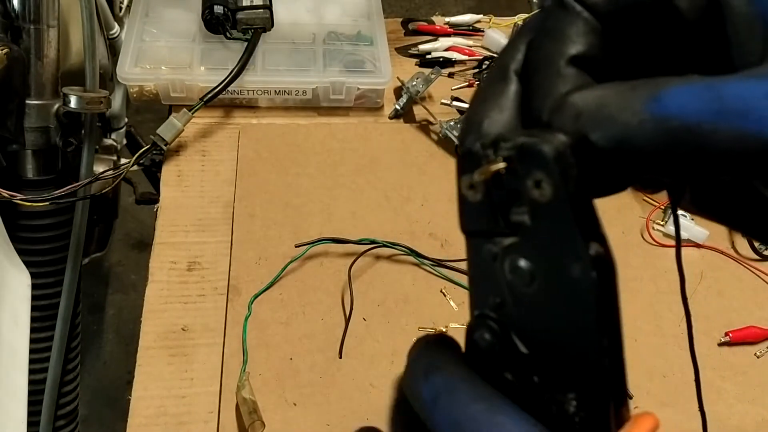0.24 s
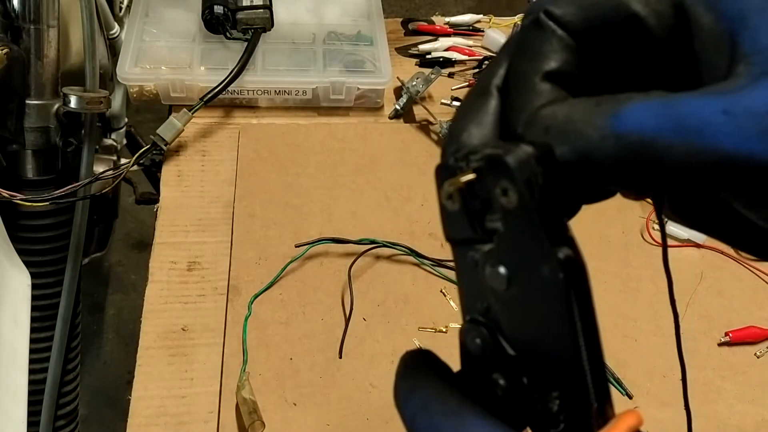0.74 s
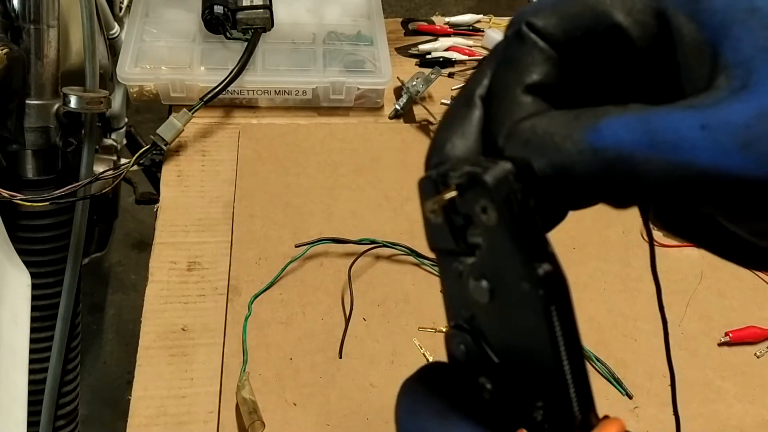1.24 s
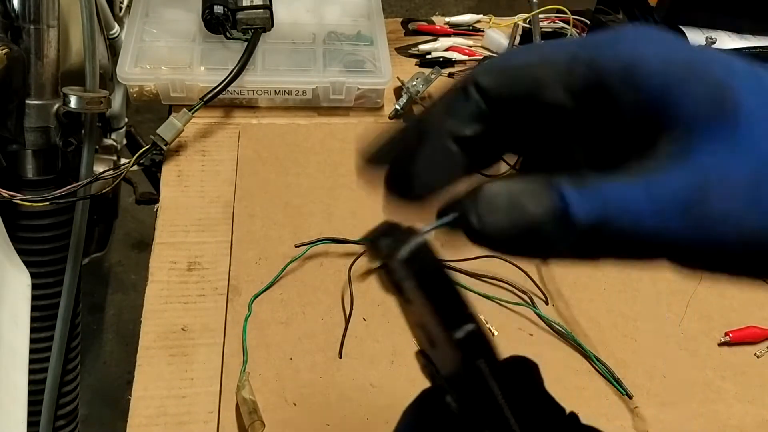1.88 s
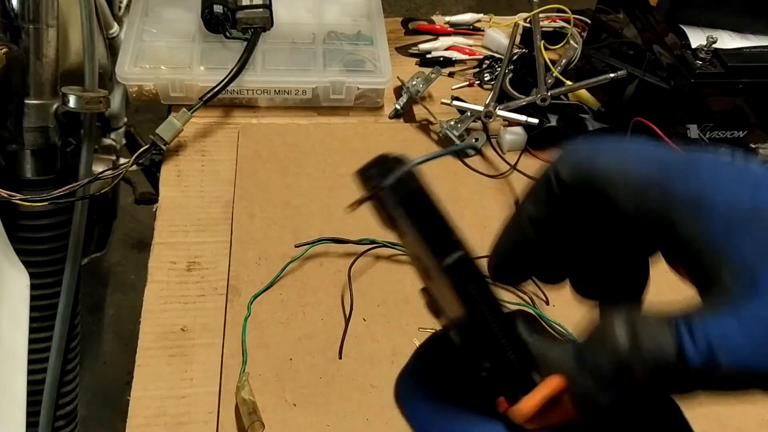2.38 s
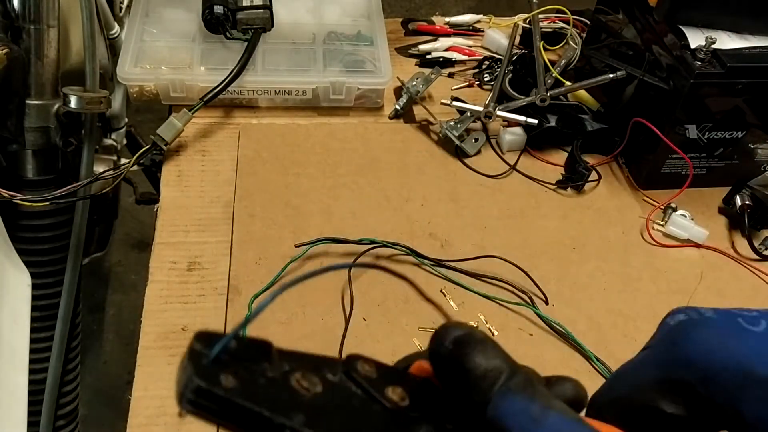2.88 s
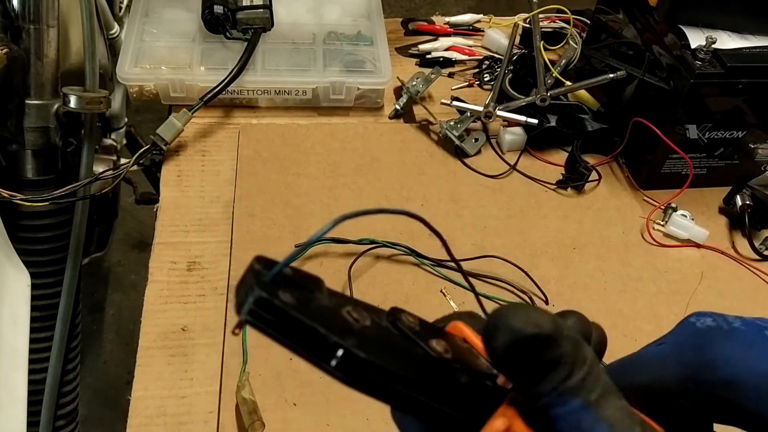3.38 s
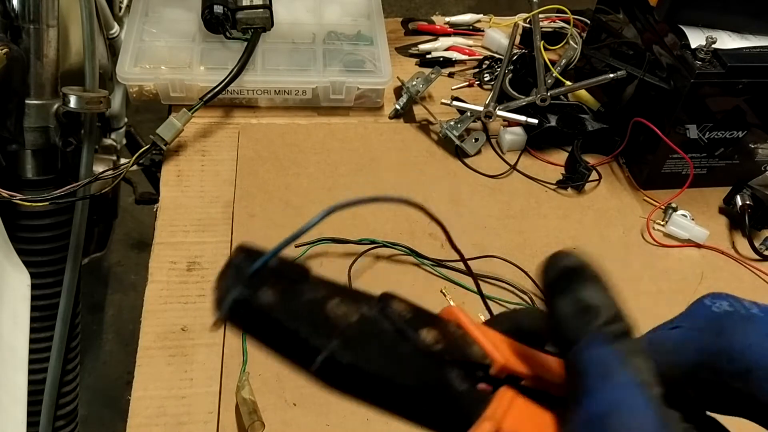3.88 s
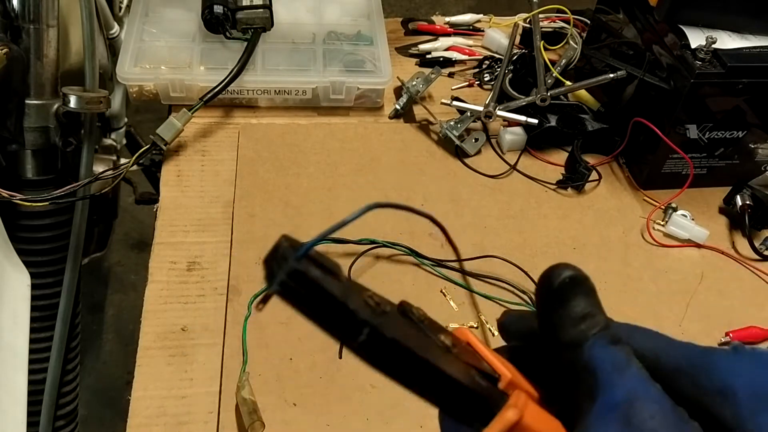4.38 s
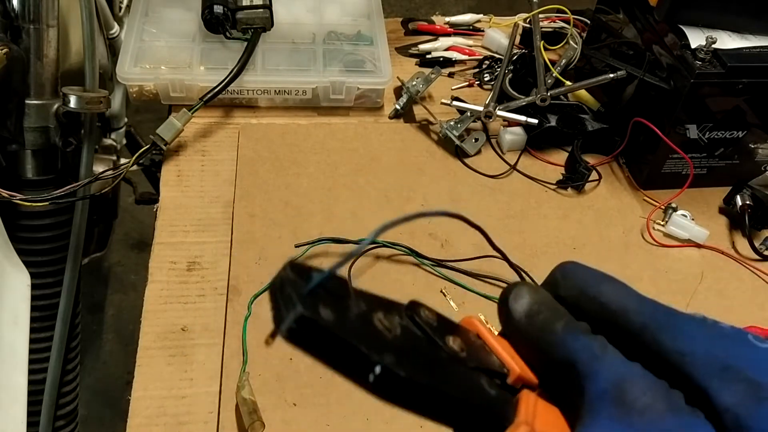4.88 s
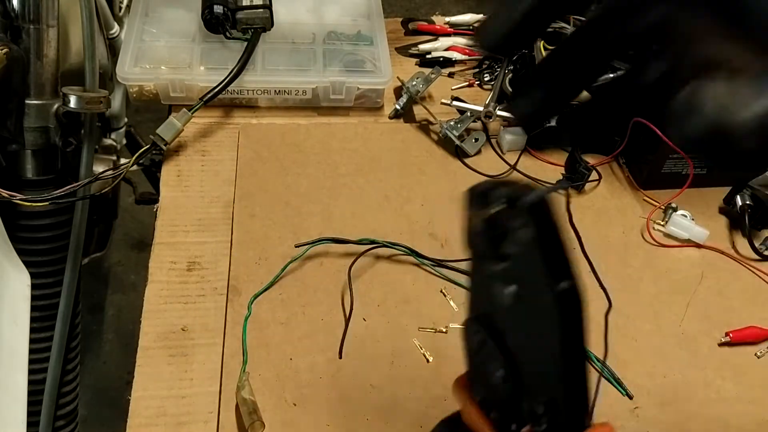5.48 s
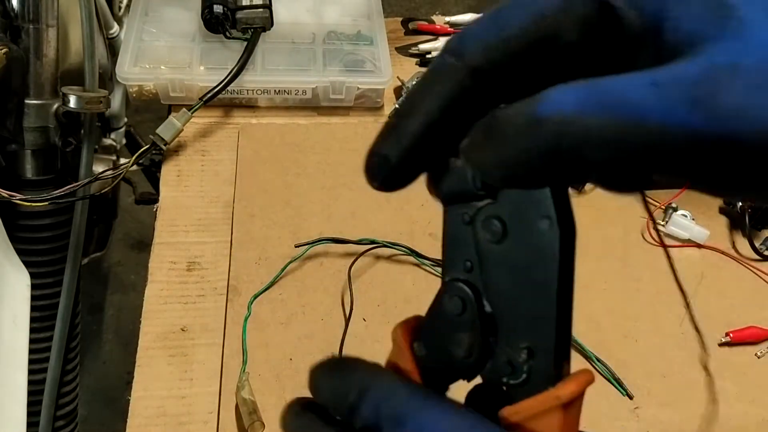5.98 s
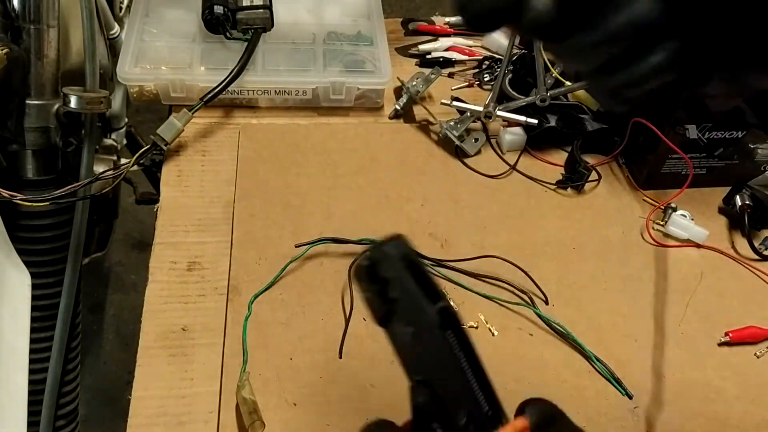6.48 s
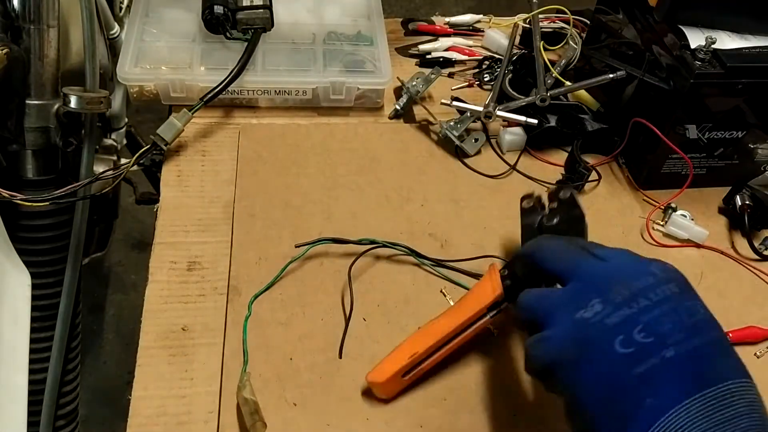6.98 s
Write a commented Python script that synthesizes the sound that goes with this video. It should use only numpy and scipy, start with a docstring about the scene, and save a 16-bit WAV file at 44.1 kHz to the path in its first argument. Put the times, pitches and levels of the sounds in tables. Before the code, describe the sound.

Ratchet crimping pliers are worked close to the microphone in a small hard room, over faint air, hum and low arm shuffling. At about 1.2 seconds comes one loud, bright metallic snap, followed by three quick ones between 1.5 and 1.7 seconds. Each pings, leaves the steel ringing thinly and has a short echo. From about 2 to 5.8 seconds it is much quieter: rubber gloves slide with a soft hiss while wire and handles tick lightly, most noticeably around 3.3 and 5.3 seconds. A smaller click at 5.8 seconds leads to a rapid run of five sharp ratchet snaps from 6 to 6.2 seconds, with dull bumps through the handles. Around 6.8 seconds the pliers scrape faintly across the cardboard-covered bench amid more glove rubbing and ticks. At about 7.2 seconds they are put down with a thud and a metallic clack.

```python
"""Bright snaps of ratchet crimping pliers, close by, over a cardboard-covered bench in a small hard room.
The pawl drops from tooth to tooth: each snap chatters, pings and leaves the steel ringing faintly.
Gloves hiss by friction; wire and handles tick in the hand; air, hum and arm shuffle lie underneath.
At the end the pliers scrape the cardboard and are put down with a thud and a clack."""
import sys
import numpy as np
from scipy import signal
from scipy.fft import rfft, irfft, next_fast_len
from scipy.io import wavfile

SR = 44100
rng = np.random.default_rng(int(sys.argv[2]) if len(sys.argv) > 2 else 0)


def wrap_up_sound(samples):
    """Save the sound to the file named by the first command line argument, as 16-bit audio."""
    columns = np.atleast_2d(samples).T
    # keep every value between -1 and 1, then stretch to whole-number steps
    tamed = np.clip(columns, -1, 1)
    steps = np.round(tamed * 32767).astype(np.int16)
    wavfile.write(sys.argv[1], SR, steps)


N = 319680
TIME_S = np.arange(N) / SR
SNAP_RISE_S = 0.0005

# Left-right likeness of near and of diffuse sound: freq_hz, correlation
NEAR_CORRELATION = [(100, 1), (1000, 0.73), (3000, 0.46), (7000, 0.081), (14000, 0.18)]
AIR_CORRELATION = [(60, 0.58), (150, 0.77), (380, 0.29), (950, -0.18), (2380, -0.08), (5980, 0.033),
                   (15000, 0.08)]
# Balance of the tool and of the background: freq_hz, left_over_right_db
TOOL_BALANCE = [(200, 13.5), (800, 1), (2400, 2.5), (4500, -3.5), (6800, -4.5), (9200, -2.5), (11300, 18),
                (12400, 20.5), (14500, 12)]
AIR_BALANCE = [(60, 1), (150, 0), (380, 3), (950, -1), (2380, 0), (5980, -2.5), (15000, 7.5)]
# Room decay: freq_hz, t60_s
ROOM_T60 = [(100, 0.85), (500, 0.79), (1500, 1), (3500, 1), (7000, 0.84), (11000, 0.56), (16000, 0.26)]
# Source spectra: freq_hz, gain_db
AIR_SPECTRUM = [(20, -19), (45, 1), (75, -6), (130, -5), (220, -3), (280, -4.5), (380, -3), (580, -5.5),
                (680, -11.5), (800, -11.5), (1400, -13), (2800, -19.5), (6000, -22), (11500, -18.5),
                (12800, -23), (16000, -42.5)]
SHUFFLE_SPECTRUM = [(25, -14), (50, -2.5), (100, -6), (200, -5), (310, 2.5), (500, -11.5), (900, -8.5),
                    (2500, -38.5)]
RUB_SPECTRUM = [(100, -11), (400, -25), (900, 1), (1900, -5), (3200, -1), (4800, 4), (8000, 8.5),
                (10200, 7.5), (11700, 5.5), (13000, -4), (16000, -7.5)]
TICK_SPECTRUM = [(60, -22), (350, 7.5), (700, 4.5), (1800, 3), (3200, 2), (5000, -1), (8000, 0.5),
                 (11500, -1.5), (16000, -17)]
THUD_SPECTRUM = [(40, -16.5), (75, -16.5), (120, -9), (240, 2), (550, -1), (1000, 8), (2000, -4),
                 (8000, -18)]
SNAP_SPECTRUM = [(60, -22.5), (250, -19), (700, -30), (1500, -20.5), (2600, -11.5), (3600, -11.5),
                 (5800, -4), (7800, -1), (9600, 0.5), (11000, -5.5), (12500, -4), (16000, -4)]
SNAP_ECHO_SPECTRUM = [(60, -22), (250, -25), (800, -22.5), (1800, -20.5), (2800, -11.5), (3900, -13),
                      (5500, -8.5), (7000, -3), (9600, -3.5), (11700, 3), (12800, -11), (16000, -11)]
# Background tones: start_s, length_s, pitch_hz, level_db
FAINT_TONES = [(0.0, 0.12, 483, -69), (0.078, 0.22, 626, -76.5), (0.25, 0.18, 695, -77),
               (0.36, 0.8, 794, -80), (0.754, 0.3, 600, -72.5), (2.778, 0.21, 538, -71)]
# Workshop hum: pitch_hz, level_db
HUM_PARTIALS = [(49, -85.5), (100, -81), (184.5, -73.5), (479, -80.5), (608, -88.5)]
# Arm movements: start_s, length_s, level_db
ARM_MOVES = [(0.198, 1.55, -70.5), (2.145, 1.13, -69.5), (3.24, 0.28, -66), (5.094, 0.66, -68),
             (6.178, 1.52, -61.5)]
# Glove slides on tool or wire, before the offsets in glove_rub:
# start_s, length_s, level_db, treble_over_middle_db, hollow_over_middle_db
GLOVE_STROKES = [(0.141, 0.093, -59.5, -2, -7), (1.923, 0.091, -48, 3, 7), (2.488, 0.18, -51.5, 0, -5),
                 (2.622, 0.16, -52.5, 3, 1), (2.696, 0.13, -48.5, 9.5, 7), (2.815, 0.66, -55.5, 1.5, 7),
                 (3.304, 1, -62.5, 6.5, 7), (3.66, 0.14, -49.5, 0.5, 3), (3.814, 0.095, -57.5, 2, 5),
                 (3.947, 0.4, -58.5, -1, -5), (4.297, 0.096, -50.5, 4.5, 8),
                 (4.357, 0.057, -50.5, -4.5, -8.5), (4.386, 0.76, -62.5, 8, 7.5),
                 (4.639, 0.14, -58.5, 2.5, 1.5), (5.193, 0.24, -43.5, 0.5, 3), (5.275, 0.098, -39, 18, 9.5),
                 (5.435, 0.27, -49.5, -3.5, -5), (5.688, 0.15, -54.5, -6, -7), (5.797, 0.28, -52, -0.5, -4),
                 (6.303, 0.59, -54, 2, 4.5), (6.76, 0.17, -49.5, 4, 6), (6.874, 0.17, -41, 0.5, -2)]
# Hollow resonances of the plastic grips: freq_hz, gain_db
GRIP_MODES = [(1230, -9), (1880, 5.5), (2350, 0), (3150, -23.5)]
# Wire, terminal and handle contacts: start_s, level_db, length_ms, tilt_db_per_oct, resonance_hz, lift_db
HAND_TICKS = [(0.19, -56, 5.2, 2, 1820, 6), (0.712, -55.5, 0.92, 2, 9800, 7.5),
              (1.1677, -45.5, 0.4, -1, 4500, 0.5), (1.5673, -45.5, 1.8, -0.5, 10000, 8),
              (1.9123, -44, 0.54, 3, 5500, 6), (1.9663, -46.5, 0.98, 2.5, 3690, 15),
              (1.9732, -40.5, 6.2, 2.5, 3960, 12), (2.553, -56.5, 5.2, 4, 1714, 11),
              (2.581, -59, 3.9, 2, 2410, 18), (2.931, -42.5, 1.8, 0.5, 2250, 21),
              (3.1465, -45.5, 0.9, 1, 6900, 4), (3.1595, -43, 1.8, 3.5, 2040, 16),
              (3.1805, -41, 1.1, 1.5, 2860, 16), (3.1955, -40.5, 3.3, 1.5, 5750, 5.5),
              (3.2012, -39.5, 2, 3.5, 1900, 3), (3.347, -35, 7.4, 3, 1750, 4),
              (3.669, -51.5, 2.2, 0, 1600, 12.5), (3.7372, -41.5, 6.2, 1, 6160, 9),
              (3.758, -50.5, 1.8, 1, 6000, 8.5), (3.7826, -39.5, 1.1, 1.5, 9600, 6),
              (4.0786, -46, 2.9, 1, 3000, 6), (4.104, -45.5, 1.4, 1, 3460, 8),
              (4.1424, -48.5, 3.2, 5.5, 7240, 7), (4.163, -57.5, 1, 4.5, 8000, 8),
              (4.182, -47, 3.8, 1.5, 3520, 11), (4.327, -51, 10, 2, 2900, 15),
              (4.337, -51.5, 7, -1.5, 2200, 18.5), (5.0332, -53.5, 7.4, -5.5, 1120, 5.5),
              (5.206, -53, 1.9, 0, 1800, 7), (5.2266, -56, 3.7, 0, 2630, 5.5),
              (5.245, -43.5, 0.93, 4, 6300, 13), (5.262, -41.5, 1.8, 0.5, 1300, 1.5),
              (5.2952, -38, 3.7, -1, 1270, 1), (5.346, -34, 5, 2.5, 1680, 8),
              (5.5155, -46.5, 0.75, -4.5, 3700, 19), (5.569, -49.5, 2.2, 3, 1360, 23.5),
              (5.5877, -41, 1.8, 1.5, 3220, 2.5), (5.612, -46.5, 1.6, -3.5, 2840, 10),
              (5.879, -47, 3.4, 6, 2820, 20), (6.692, -57, 2.3, 1.5, 3360, 3),
              (6.818, -35, 2.3, 4.5, 4340, 7), (6.9500, -36.5, 7, 5, 1790, 18),
              (7.1725, -41, 4.3, 0, 2220, 19), (7.178, -36.5, 27, 0.5, 2200, 11)]
# Dull blows through the handles or onto the bench: start_s, level_db, cutoff_hz, send_db, hand_weight_db
THUDS = [(1.1665, -57, 513, -6.5, -17.5), (1.1827, -48.5, 330, -11.5, -7), (1.5666, -44, 343, -2.5, -6.5),
         (1.5849, -51, 420, -4, -2), (1.669, -51.5, 149, -3, 1.5), (3.348, -43, 296, -16, -23),
         (3.3545, -49, 262, -19, -5), (4.0787, -51.5, 780, 0, -24.5), (5.9950, -43.5, 880, -17, -24),
         (6.0515, -42.5, 400, -13, -14), (6.0810, -49, 397, -11, -12), (6.1445, -64, 400, -11, -14),
         (7.1887, -26, 1480, -2, -34)]
# Pawl and jaw snaps; send_db and steel_db are trims: start_s, level_db, chatter_ms, tilt_db_per_oct,
# low_ping_hz, middle_ping_hz, high_ping_hz, send_db, tail_tilt_db_per_oct, steel_db
SNAPS = [(1.181, -13.5, 1.8, 1.5, 6960, 10660, 11980, 1, 3, -2),
         (1.5284, -11, 2.97, 0.4, 7670, 8790, 11290, -1.5, 1.5, -9.5),
         (1.5823, -13, 2.76, -1.4, 7330, 8030, 11750, 0.5, 3.5, -7),
         (1.6683, -10.5, 3.4, -0.3, 5560, 7030, 8710, -3, 1, -6.5),
         (5.8348, -25, 0.25, 0.5, 8100, 9550, 11940, -11, -1, -3),
         (5.9942, -13.5, 1.97, -0.4, 5920, 8480, 11200, -2, -2.5, 0),
         (6.0210, -13, 1.05, -1.5, 5680, 9260, 10870, -5.5, 0, -9),
         (6.049, -15.5, 1.6, -1, 5600, 8600, 11760, 1, 2, -14),
         (6.0804, -13, 2.08, 0.5, 4760, 5150, 10570, -0.5, 1, -13),
         (6.1435, -13, 0.62, 0, 4310, 7130, 10900, -0.5, 0, 0.5),
         (7.1971, -16.5, 1.04, -2, 5010, 8100, 11160, 2, -2, 1)]
# Steel plate modes, relative strength per jaw load: freq_hz, t60_s, bite_db, squeeze_db, opening_db
STEEL_MODES = [(2640, .4, -8, -6, 0), (2929, .35, -10, -10, 0), (3440, .35, -3, -1, 6),
               (4016, .55, -2, 2, -2), (4382, .5, 3, 7, -6), (4597, .35, -6, -8, 2), (4990, .45, -5, 7, 6),
               (5146, .42, 1, 8, 3), (5600, .35, 4, 2, 3), (5857, .4, 12, 3, -8), (6100, .3, 0, 7, 4),
               (6490, .35, 9, 0, 6), (7031, .35, 4, 13, 0), (7190, .35, 3, 9, 6), (7440, .35, 3, 5, 7),
               (8635, .35, 6, 0, 8), (8818, .25, 15, 0, 0), (10190, .4, 11, 12, 8), (10767, .35, 15, 3, 8),
               (11036, .35, 4, 6, 13), (11270, .5, 15, 6, 9), (11600, .4, 16, 6, 7)]
# Jaw load changes after the first bite: squeeze_start_s, opening_start_s
LOAD_CHANGES_S = (1.4, 3.0)
# Spring ringing after a snap, pitch set by its tension: start_s, pitch_hz, level_db
SPRING_RINGS = [(1.182, 10800, -46), (1.667, 11100, -48.5), (6.144, 11040, -53)]
# Random spectral ripple in the snaps' tail: spacing_hz, spread_db
TAIL_RIPPLE = (65, 4.2)
# Pliers' head dragging on the bench: start_s, length_s, level_db
BENCH_SCRAPE = (6.81, 0.25, -55.5)
# Scrape resonances: freq_hz, gain_db
CARDBOARD_MODES = [(950, -6), (1200, 3), (1850, 4), (2300, -19)]


def from_db(db):
    """Decibels to gain."""
    return 10 ** (np.asarray(db) / 20)


def unit_rms(x):
    """Scale to rms 1."""
    return x / np.sqrt(np.mean(x ** 2) + 1e-20)


def at_hz(table, hz):
    """Read a table on a log-frequency axis."""
    freqs_hz, values = np.transpose(table)
    return np.interp(np.log(np.maximum(hz, 1)), np.log(freqs_hz), values)


def butter(x, hz, kind, order):
    """Causal Butterworth filter."""
    return signal.sosfilt(signal.butter(order, hz, kind, fs=SR, output="sos"), x)


def resonance(x, hz, q):
    """Band-pass with unit peak gain."""
    return signal.lfilter(*signal.iirpeak(hz, q, fs=SR), x)


def coloured(x, spectrum, tilt_db_per_oct=0):
    """Minimum-phase filter; the tilt acts above 1 kHz and pivots at 4 kHz."""
    size = 2 * next_fast_len(x.shape[-1] // 2 + 2048)
    hz = np.fft.rfftfreq(size, 1 / SR)
    octaves = np.log2(np.maximum(hz, 1000) / 4000)
    gain = from_db(at_hz(spectrum, hz) + tilt_db_per_oct * octaves)
    cepstrum = irfft(np.log(gain), size)
    cepstrum[1:size // 2] *= 2
    cepstrum[size // 2 + 1:] = 0
    return irfft(rfft(x, size) * np.exp(rfft(cepstrum)), size)[..., :x.shape[-1]]


def stereo_noise(correlation, size):
    """White noise with the given left-right correlation."""
    mid, side = rfft(rng.standard_normal((2, size)))
    alike = at_hz(correlation, np.fft.rfftfreq(size, 1 / SR))
    return irfft(np.sqrt(1 + alike) * mid + np.sqrt(1 - alike) * side * [[1], [-1]], size) / np.sqrt(2)


def drift(rate_hz):
    """Slow random curve with spread 1."""
    knots = rng.standard_normal(8000)
    return np.interp(TIME_S * rate_hz, np.arange(len(knots)), knots) * np.sqrt(1.5)


def movement(start_s, length_s, rise_share=0.28, fall_share=0.58):
    """Speed of a movement, 0-1: speeds up, holds, slows down."""
    progress = (TIME_S - start_s) / length_s
    ramp = np.clip(np.minimum(progress / rise_share, (1 - progress) / fall_share), 0, 1)
    return np.sin(np.pi / 2 * ramp) ** 1.5


def panned(x, left_db):
    """Lean a sound to the left."""
    return x * from_db([[left_db / 2], [-left_db / 2]])


def leaned(x, balance, share=1):
    """Pan band by band."""
    half = np.array(balance) * [1, share / 2]
    return np.array([coloured(x[0], half), coloured(x[1], half * [1, -1])])


def add(track, start_s, sound):
    """Mix a sound in at a time."""
    i = int(start_s * SR)
    track[:, i:i + sound.shape[-1]] += sound[..., :N - i]


def at_level(sound, level_db):
    """Give a short sound the energy of 5 ms at this level."""
    energy = np.mean(np.sum(sound ** 2, axis=-1))
    return sound * from_db(level_db) * np.sqrt(.005 * SR / energy)


def room(x, first_s=0.0019, build_s=0.0029, early_db=8.5, early_s=0.1):
    """Diffuse echoes of unit energy: quick build-up, decay band by band."""
    t = TIME_S[:SR]
    white = rfft(stereo_noise(AIR_CORRELATION, SR))
    centres_hz = np.geomspace(100, 16000, 12)
    log_hz = np.log(np.maximum(np.fft.rfftfreq(SR, 1 / SR), 1))
    tail = 0
    for hz, share in zip(centres_hz, np.eye(len(centres_hz))):
        band = irfft(white * np.interp(log_hz, np.log(centres_hz), share), SR)
        tail += band * from_db(-60 * t / at_hz(ROOM_T60, hz))
    tail *= np.clip((t - first_s) / build_s, 0, 1)
    tail *= from_db(early_db * np.exp(-t / early_s))
    return signal.fftconvolve(x, unit_rms(tail) / np.sqrt(SR), axes=-1)[:, :N]


def faint_tones(waver_hz=11, flutter_db=5.5):
    """Thin tones come and go, unsteady in pitch and level."""
    tones = 0
    for start_s, length_s, pitch_hz, level_db in FAINT_TONES:
        phase = 2 * np.pi * np.cumsum(pitch_hz + waver_hz * drift(33)) / SR
        tones += from_db(level_db + flutter_db * drift(20)) * movement(start_s, length_s) * np.sin(phase)
    return tones


def background(air_db=-66, waver_db=2, resting_arms_db=-74):
    """Still air, wavering hum, faint tones and the low shuffle of the arms."""
    air_gain = from_db(air_db + waver_db * drift(10))
    air = air_gain * unit_rms(coloured(stereo_noise(AIR_CORRELATION, N), AIR_SPECTRUM))
    hum = 0
    for pitch_hz, level_db in HUM_PARTIALS:
        amplitude = np.sqrt(2) * from_db(level_db + drift(2.6))
        hum += amplitude * np.sin(2 * np.pi * pitch_hz * TIME_S + .5 * drift(0.85))
    moves = sum(from_db(db) * movement(start_s, length_s) for start_s, length_s, db in ARM_MOVES)
    effort = np.hypot(from_db(resting_arms_db), moves)
    shuffle = effort * unit_rms(coloured(stereo_noise(AIR_CORRELATION, N), SHUFFLE_SPECTRUM))
    return leaned(air + hum + faint_tones() + shuffle * from_db(drift(27)), AIR_BALANCE)


def glove_rub(gain_db=-5.5, treble_db=7, grip_db=-3, catches_per_s=240, catch_db=2, split_hz=4500,
              judder_db=1.5, echo_db=-4):
    """Rubber slides with a fine hiss, catches in tiny grains and wakes the hollow grips."""
    catches = (rng.random(N) < catches_per_s / SR) * from_db(3 * np.minimum(rng.exponential(1, N), 3))
    grains = unit_rms(signal.lfilter([1], [1, -.95], catches + 1e-18))
    friction = stereo_noise(NEAR_CORRELATION, N) * np.hypot(1, from_db(catch_db) * grains)
    slide = coloured(friction, RUB_SPECTRUM)
    treble = unit_rms(butter(slide, split_hz, "high", order=3))
    finger_pressure = from_db(judder_db * drift(45))
    middle = unit_rms(butter(slide, split_hz, "low", order=3) * finger_pressure)
    # The shifting hold frees and damps each grip mode.
    modes = (from_db(db + 5.1 * drift(22.79)) * resonance(slide, hz, q=5.2) for hz, db in GRIP_MODES)
    hollow = unit_rms(sum(modes))
    powers = np.zeros((3, N))
    for start_s, length_s, level_db, bright_db, hollow_db in GLOVE_STROKES:
        shares = from_db([0, bright_db + treble_db, hollow_db + grip_db])
        envelope = from_db(level_db + gain_db) * movement(start_s, length_s)
        powers += np.outer(shares / np.linalg.norm(shares), envelope) ** 2
    near = sum(part * np.sqrt(power) for part, power in zip((middle, treble, hollow), powers))
    return panned(leaned(near, TOOL_BALANCE, share=0.95), left_db=2.5) + from_db(echo_db) * room(near)


def chatter(length_ms, ring_ms, after_db, after_ms, blow_gain, size=4096):
    """Hard parts meet and chatter, with an optional sharp blow; their dense modes die, fast at first."""
    late_ms = np.maximum(TIME_S[:size] * 1000 - length_ms, 0)
    envelope = np.exp(-late_ms / ring_ms) + from_db(after_db) * np.exp(-late_ms / after_ms)
    rattle = stereo_noise(NEAR_CORRELATION, size) * envelope
    arrival_samples = rng.integers(0, 6, (2, 1))
    return rattle + blow_gain * np.linalg.norm(rattle[0]) * (np.arange(size) == arrival_samples)


def hand_ticks(echo_db=-10):
    """Wire, terminal and grips touch lightly; each contact point favours one resonance."""
    near = np.zeros((2, N))
    for start_s, level_db, length_ms, tilt_db_per_oct, resonance_hz, lift_db in HAND_TICKS:
        touch = chatter(length_ms, ring_ms=1, after_db=-11.5, after_ms=17, blow_gain=0.31)
        touch = coloured(touch, TICK_SPECTRUM, tilt_db_per_oct)
        touch += (from_db(lift_db) - 1) * resonance(touch, resonance_hz, q=3.1)
        add(near, start_s, at_level(touch, level_db))
    return panned(leaned(near, TOOL_BALANCE, share=0.72), left_db=2) + from_db(echo_db) * room(near)


def thuds(echo_db=-5, weight_hz=110):
    """Soft contact: a low-passed push into a damped body, plus the deep bump of the hand's weight."""
    near, sent = np.zeros((2, 2, N))
    for start_s, level_db, cutoff_hz, send_db, weight_db in THUDS:
        push = butter(signal.unit_impulse(SR // 5), cutoff_hz, "low", order=4)
        bump = from_db(weight_db) * butter(push, weight_hz, "low", order=1)
        blow = at_level(coloured(push, THUD_SPECTRUM) + bump, level_db)
        add(near, start_s, blow)
        add(sent, start_s, blow * from_db(send_db + echo_db))
    return near + room(sent)


def pings(pitches_hz, chatter_ms, size, levels_db=(-5.5, -7, -5), ring_ms=0.89):
    """Struck parts sound three short tones while they chatter; random phase per channel."""
    t = TIME_S[:size]
    envelope = np.clip(t / SNAP_RISE_S, 0, 1) * np.exp(-np.maximum(t * 1000 - chatter_ms, 0) / ring_ms)
    return envelope * sum(from_db(db) * np.sin(2 * np.pi * (hz * t + rng.random((2, 1))))
                          for hz, db in zip(pitches_hz, levels_db))


def steel_ring(load_index, scatter_db=0.5):
    """A snap strikes the long plate modes; jaw load sets which ring freely."""
    hz, t60_s, *levels_db = np.transpose(STEEL_MODES)[:, :, None]
    t = TIME_S[:SR]
    strength = from_db(levels_db[load_index] + scatter_db * rng.uniform(-1.1, 1, (2, len(hz), 1)))
    # Left and right are up to half a cycle apart.
    phase = rng.uniform(0, 2 * np.pi, (len(hz), 1)) + rng.uniform(0, np.pi, (2, len(hz), 1))
    return np.sum(strength * from_db(-60 * t / t60_s) * np.sin(2 * np.pi * hz * t + phase), axis=1)


def spring_ring(pitch_hz, t60_s=0.93):
    """The spring sings on: one thin, slowly dying tone."""
    t = TIME_S[:2 * SR]
    return from_db(-60 * t / t60_s) * np.sin(2 * np.pi * pitch_hz * t)


def rippled(x):
    """A fixed random ripple of narrow peaks and dips gives the snaps' tail a rough, jangling colour."""
    spacing_hz, spread_db = TAIL_RIPPLE
    hz = np.arange(2400, 12500, spacing_hz)
    gain = unit_rms(from_db(spread_db * np.clip(rng.standard_normal(len(hz)), -2, 1.3)))
    gain[[0, -1]] = 1
    return coloured(x, np.column_stack([hz, 20 * np.log10(gain)]))


def wall_echo(x, delay_s=0.011, echo_db=-18):
    """One reflection off a hard surface nearby."""
    return from_db(echo_db) * np.pad(x, [(0, 0), (int(delay_s * SR), 0)])[:, :N]


def ratchet(echo_db=-4.5, ring_db=-39, chatter_echo_db=-4, ring_echo_db=-4):
    """The pawl drops: a bright pinging crack, ringing steel and spring, room echoes."""
    near, sent, ringing = np.zeros((3, 2, N))
    for (start_s, level_db, chatter_ms, tilt_db_per_oct, *pings_hz,
         send_db, tail_tilt_db_per_oct, steel_db) in SNAPS:
        contact = chatter(chatter_ms, ring_ms=0.35, after_db=-15, after_ms=4.5, blow_gain=0)
        size = contact.shape[-1]
        contact *= np.clip((TIME_S[:size] + 1 / SR) / SNAP_RISE_S, 0, 1)
        crack = coloured(contact + pings(pings_hz, chatter_ms, size), SNAP_SPECTRUM, tilt_db_per_oct)
        add(near, start_s, at_level(crack, level_db))
        load_index = np.searchsorted(LOAD_CHANGES_S, start_s)
        add(ringing, start_s, steel_ring(load_index) * from_db(level_db + steel_db + ring_db))
        # The walls get a sharp blow, then chatter, whose uneven spectrum makes the tail metallic.
        late_chatter = np.roll(contact[0], round(.001 * SR)) / np.linalg.norm(contact[0])
        radiated = signal.unit_impulse(size) + from_db(chatter_echo_db) * late_chatter
        radiated = coloured(radiated, SNAP_ECHO_SPECTRUM, tail_tilt_db_per_oct)
        add(sent, start_s, at_level(radiated, level_db + send_db + echo_db))
    for start_s, pitch_hz, level_db in SPRING_RINGS:
        add(ringing, start_s, from_db(level_db) * spring_ring(pitch_hz))
    near = leaned(near, TOOL_BALANCE)
    return near + wall_echo(near) + ringing + room(rippled(sent) + from_db(ring_echo_db) * ringing)


def bench_scrape(q=7.5, rough_db=3, echo_db=-4):
    """Steel drags unevenly over cardboard."""
    start_s, length_s, level_db = BENCH_SCRAPE
    friction = stereo_noise(NEAR_CORRELATION, N)
    body = sum(from_db(db + rough_db * drift(40)) * resonance(friction, hz, q)
               for hz, db in CARDBOARD_MODES)
    near = from_db(level_db) * movement(start_s, length_s) * unit_rms(body)
    return near + from_db(echo_db) * room(near)


def scene():
    """Tool, hands, workshop and bench, in stereo."""
    tool = ratchet() + hand_ticks() + panned(thuds(), left_db=4)
    return tool + glove_rub() + background() + bench_scrape()


def record(dry, shelf_db=-12, ceiling=0.85, cutoff_hz=17000):
    """Treble shelf above 12 kHz, soft clip, steep low-pass."""
    shelved = coloured(dry, [(12000, 0), (12300, shelf_db)])
    rounded = ceiling * np.tanh(shelved / ceiling)
    return signal.sosfilt(signal.cheby2(14, 70, cutoff_hz, fs=SR, output="sos"), rounded)


dry = scene()
out = record(dry)
wrap_up_sound(out)
```